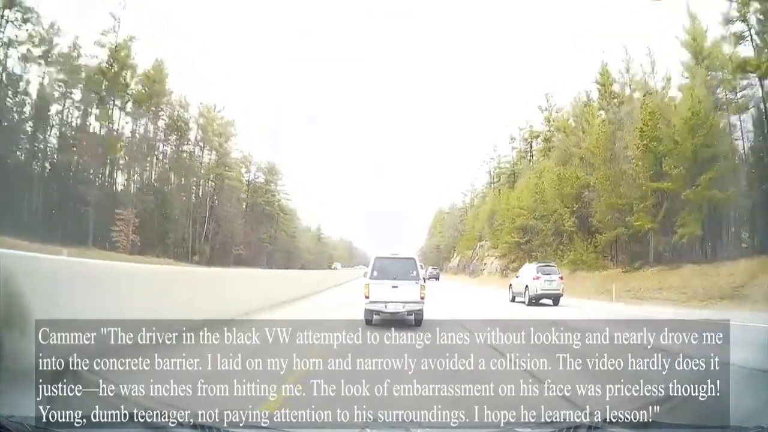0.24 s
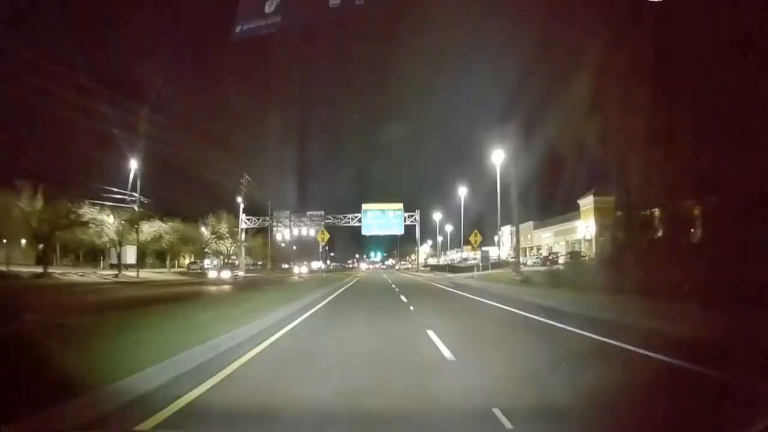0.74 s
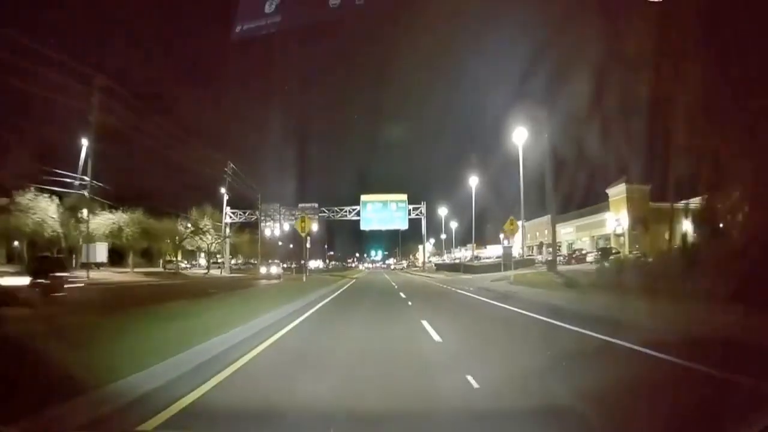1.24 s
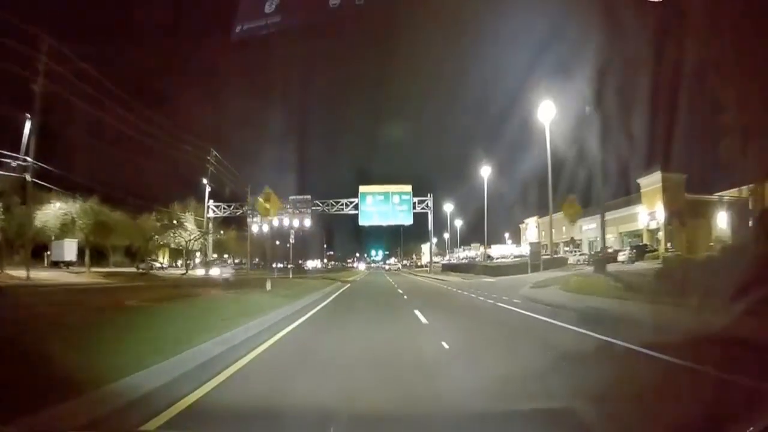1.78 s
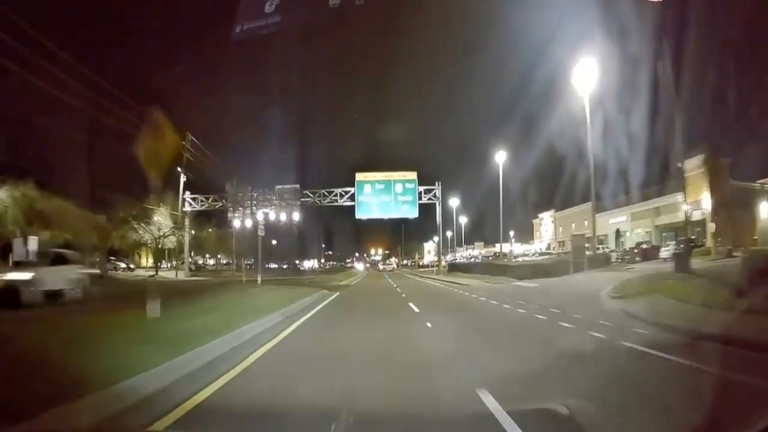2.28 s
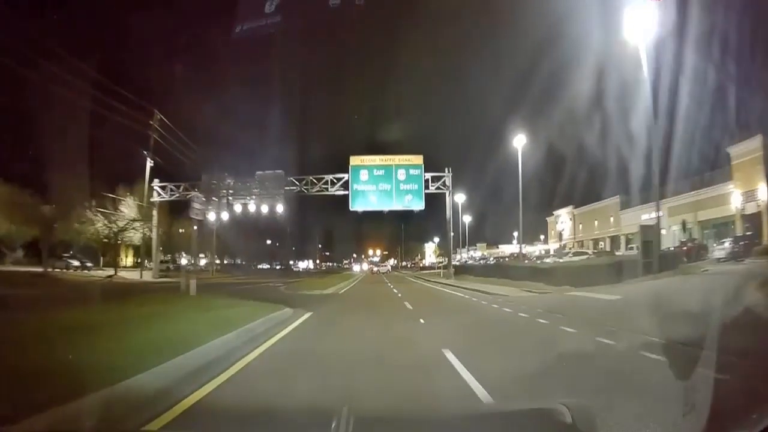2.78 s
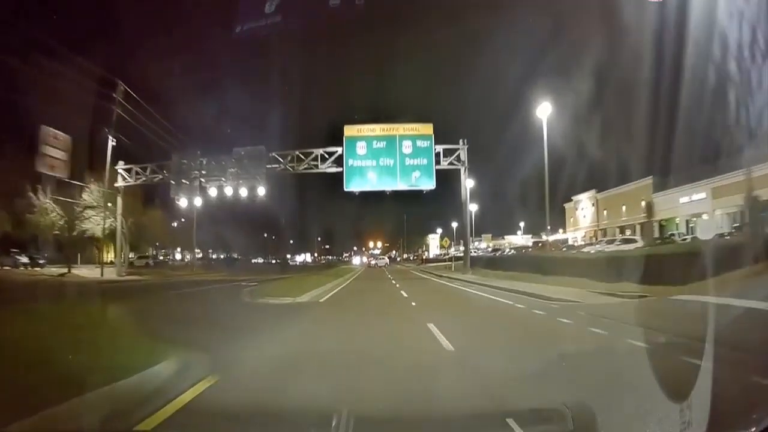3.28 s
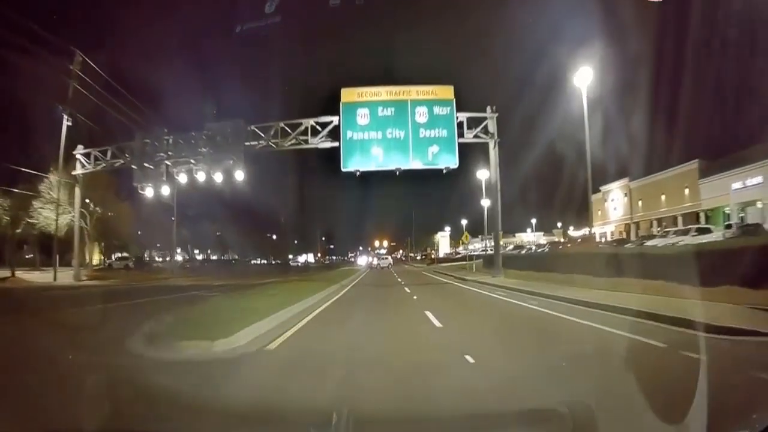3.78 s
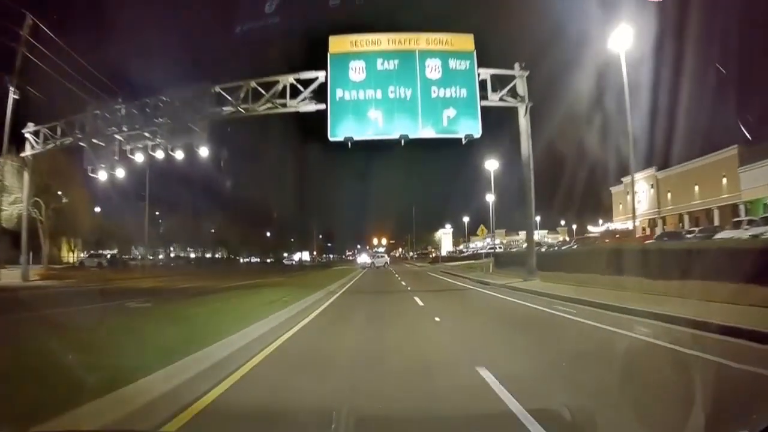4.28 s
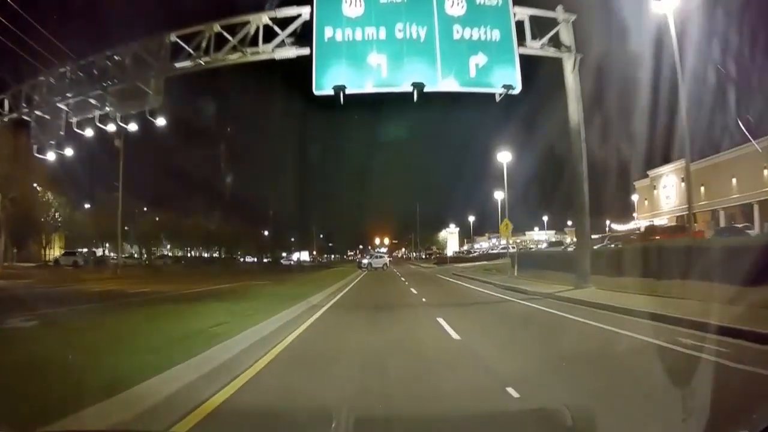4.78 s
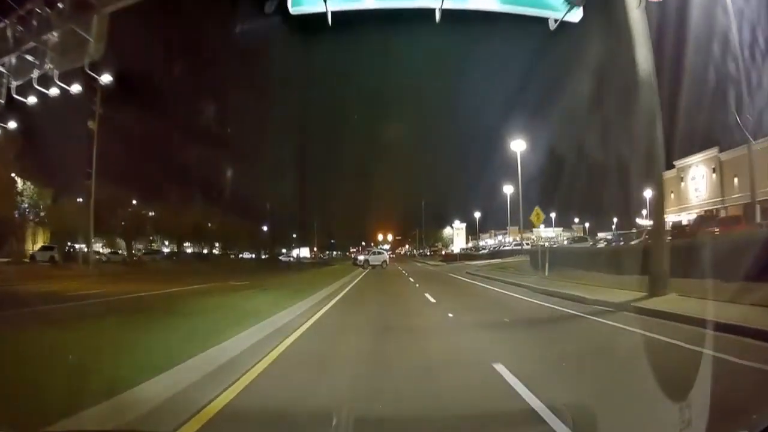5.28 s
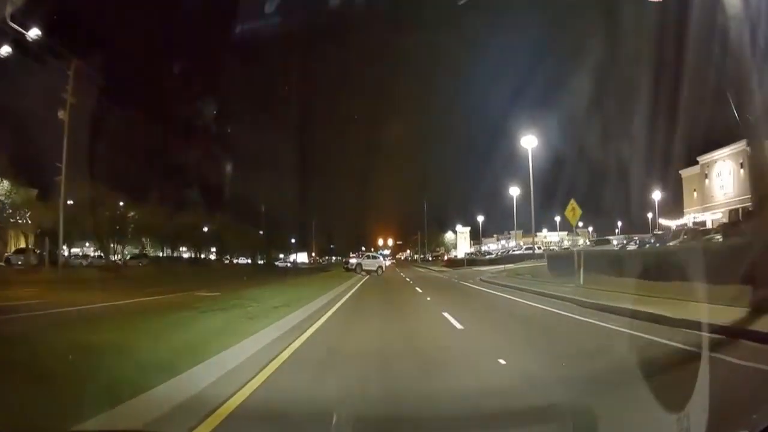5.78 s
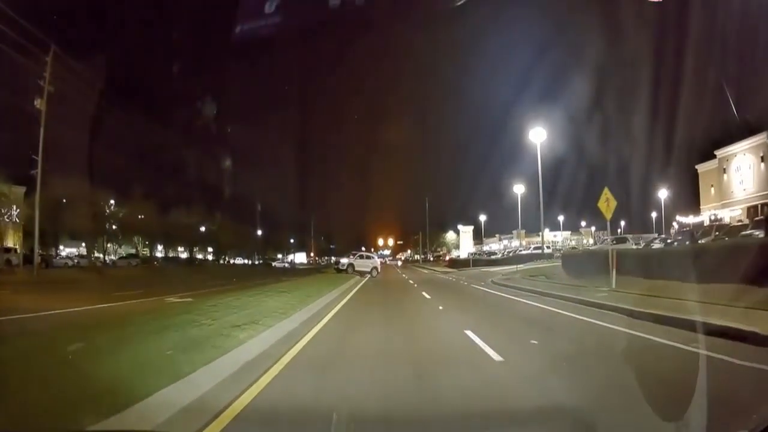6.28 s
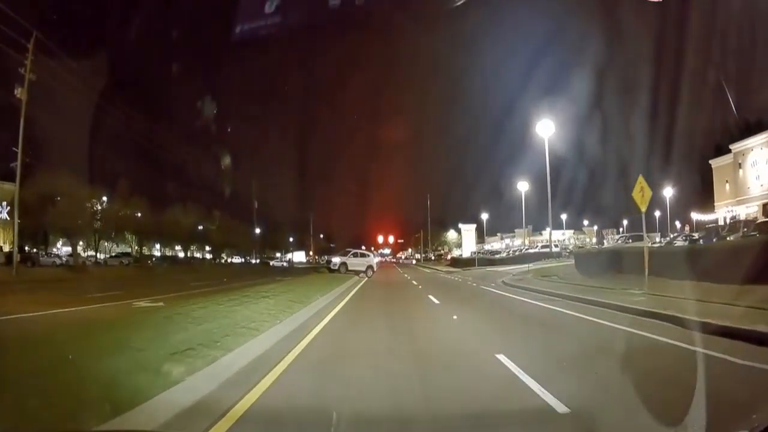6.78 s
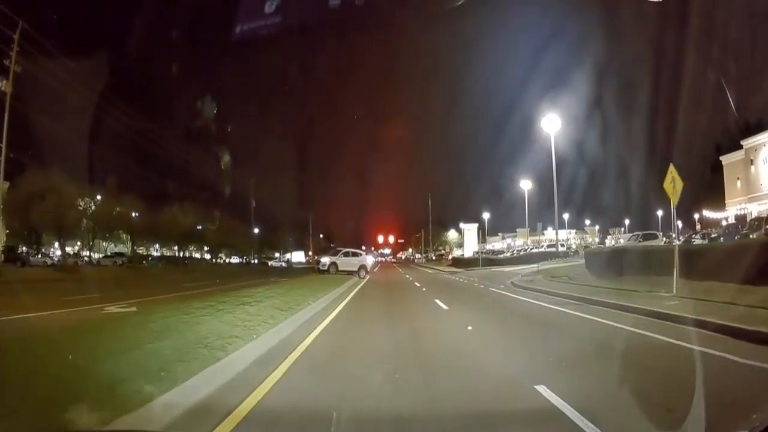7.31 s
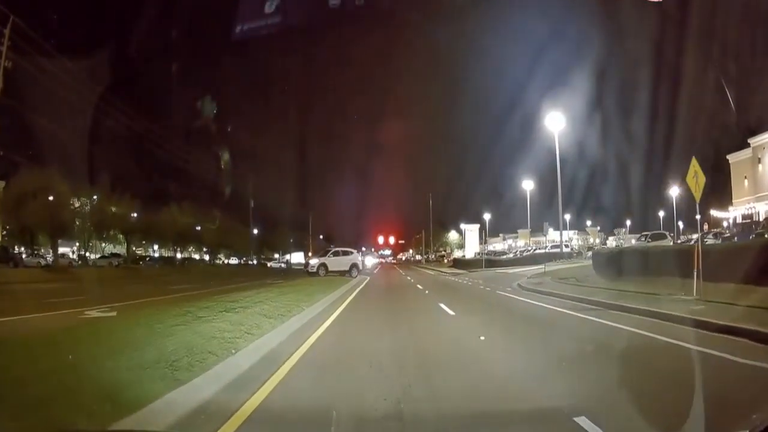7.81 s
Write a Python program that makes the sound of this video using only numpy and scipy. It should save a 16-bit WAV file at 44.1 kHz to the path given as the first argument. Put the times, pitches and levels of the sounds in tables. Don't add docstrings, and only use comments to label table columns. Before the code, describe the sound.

Silence until 0.7 s, then car cabin noise cuts in at once: deep body boom, humming floor and tyre resonance, broad tyre roar and coarse tread hiss, with a weak low engine note underneath. A small dry trim creak comes near 1.1 s and a lone knock near 2 s. At 2.8 s a hard short double thump starts a cluster of knocks with buzzing, rattling trim and a low body heave, ending with low thumps at 3.0 and 3.07 s. The surface is then smoother and the tread hiss drops. From 3.3 s the loose plastic camera mount ticks in light chattering clusters about every 0.6 s. The engine note sinks steadily; rumble swells slightly around 5 to 5.5 s, then road noise fades strongly until 8 s, exposing thin microphone hiss. Close, slightly dull small-camera sound with tiny compression flutters.

```python
import sys
import numpy as np
from scipy import signal
from scipy.fft import rfft, irfft, next_fast_len
from scipy.io import wavfile
from scipy.ndimage import uniform_filter1d

SR = 44100
rng = np.random.default_rng(int(sys.argv[2]) if len(sys.argv) > 2 else 0)


def to_wav(s):
    ch = np.atleast_2d(s).T
    pcm = np.round(np.clip(ch, -1, 1) * 32767)
    wavfile.write(sys.argv[1], SR, pcm.astype(np.int16))


def convert_level_to_amplitude(level_db):
    exponent = np.asarray(level_db, float) / 20
    return 10 ** exponent


N = 355005
T = np.arange(N) / SR
BURST_T = np.arange(4000) / SR
COARSE_END_S = 3.115


def evened(x):
    return x / np.sqrt(np.mean(x ** 2) + 1e-20)


def curves(rows):
    s, *columns = np.transpose(rows)
    return [np.interp(T, s, column) for column in columns]


def add(mix, start_s, sound):
    part = mix[round(start_s * SR):][:len(sound)]
    part += sound[:len(part)]


def resonance(hz, centre_hz, width_hz):
    return 1 / (1 + (2 * (hz - centre_hz) / width_hz) ** 2)


def colour(points, lifts=()):
    point_hz, point_db = np.transpose(points)

    def shape(hz):
        slope_db = np.interp(np.log(hz + 1), np.log(point_hz), point_db)
        return convert_level_to_amplitude(slope_db + sum(db * resonance(hz, centre, width) for centre, width, db in lifts))
    return shape


def modes(rows):
    return lambda hz: np.sqrt(sum((convert_level_to_amplitude(db) * resonance(hz, centre, width)) ** 2 for centre, width, db in rows))


def noise(shape, size=N):
    long = next_fast_len(size)
    spectrum = rfft(rng.standard_normal(long))
    return evened(irfft(spectrum * shape(np.fft.rfftfreq(long, 1 / SR)), long)[:size])


def wobble(top_hz):
    return noise(lambda hz: (hz > .5) / (1 + (hz / top_hz) ** 4))


def burst(shape, length_s, rise_s=0.00049):
    envelope = np.minimum(BURST_T / rise_s, 1) * np.exp(-(BURST_T / length_s) ** 1.5)
    return noise(shape, size=4000) * envelope


def coarse(fade_s):
    return np.clip((COARSE_END_S - T) / fade_s, 0, 1)


# start_s, unevenness_db, tyre_ripple_db, fine_texture_db
ROAD = [(.8, -25, -44, -29), (1.2, -27.5, -37, -29), (1.6, -30.5, -37, -29.5), (2.0, -28.5, -35, -29),
        (2.6, -25.5, -30, -28), (3.07, -29, -46.5, -29.5), (3.25, -29, -30, -33), (3.6, -29, -35.5, -33),
        (3.95, -28, -34, -34), (4.3, -26.5, -31, -36.5), (4.7, -26, -32.5, -36), (5.15, -25, -33, -38.5),
        (5.55, -25.5, -29.5, -40.5), (6.1, -29, -35, -43.5), (6.45, -30, -42, -45.5),
        (6.95, -31.5, -46.5, -47), (7.4, -37.5, -52, -48.5), (8.05, -39.5, -61, -51)]
# centre_hz, width_hz, level_db
BOOM = [(30, 39, -1.5), (42.5, 15, 4.5), (52.3, 16, -16)]
PANEL = [(109.8, 14, -4), (123.9, 8.4, 2), (139, 9.5, -3.5), (153.4, 34.5, -9), (87, 23, -15),
         (312, 90, -19)]
CAVITY = [(195, 23, -14), (225.4, 8, -4), (242, 6, 3.5), (258.8, 18, -12.5)]
# level_db at reference, follow_db_per_db, swell_db, swell_hz
FOLLOW = [
    (-33, 0.95, 1.1, 4.1),
    (-31, 1.0, 1.64, 9.6),
    (-28, 1.0, 1.0, 16),
]
COARSE_SHAKE_DB = (1.5, -4, -.5)


def structure():
    shake_ref_db = -28
    out = np.zeros(N)
    uneven_db, ripple_db, _ = curves(ROAD)
    on_coarse = coarse(.3)
    layers = zip((BOOM, PANEL, CAVITY), (uneven_db, uneven_db, ripple_db), COARSE_SHAKE_DB, FOLLOW)
    for rows, shake_db, coarse_db, (db, follow, swell_db, swell_hz) in layers:
        hum = noise(modes(rows))
        swell = np.sqrt(uniform_filter1d(uniform_filter1d(hum ** 2, 4500), 4500) + .05)
        level_db = db + follow * (shake_db - shake_ref_db) + coarse_db * on_coarse
        level_db = level_db + swell_db * wobble(swell_hz)
        out += convert_level_to_amplitude(level_db) * hum / swell ** .9
    return out


def grip():
    return curves(ROAD)[2] + 35


# corner_hz, level_db_per_hz
ROAR = [(15, -30), (70, -2.5), (240, 2.5), (600, -5.5), (1100, -7.5), (1350, -14.5), (1700, -44),
        (2400, -58.5)]
TREAD = [(900, -26), (1400, 7), (2000, 0), (2650, -2), (3580, -8.5), (3800, -16), (4800, -20.5),
         (8000, -24)]
# centre_hz, width_hz, lift_db
CABIN = [(20, 5, 8), (314, 37, -5), (361.6, 9.6, 7), (402.4, 14, 3.5), (465, 48, 3), (539, 46, 4.5),
         (659.6, 38, 5.5), (756, 54, 6), (901, 102, 5.5), (1023, 30.5, 8), (1187, 86, 5), (1297, 88, 3),
         (1670, 40, 12)]
HOUSING = [(2905, 140, 8), (3130, 110, 3), (3510, 140, 6)]


def tyres():
    roar_db, tread_db, coarse_tread_db, wind_db = -33, -56.5, 2.5, -65
    grip_db = grip()
    texture = wobble(19.0)
    roar = convert_level_to_amplitude(roar_db + grip_db + 0.47 * texture) * noise(colour(ROAR, CABIN))
    tread = convert_level_to_amplitude(tread_db + grip_db + coarse_tread_db * coarse(.03))
    tread = tread + convert_level_to_amplitude(wind_db)
    tread = tread * convert_level_to_amplitude(0.2 * texture + 1.06 * wobble(22.5)) * noise(colour(TREAD, HOUSING))
    return roar + tread


# start_s, knock_peak_db, length_s, rattle_db, low_mode_db
JOINTS = [
    (2.7800, -9, .005, -39, -7),
    (2.7904, -15, .02, -42, -14),
    (2.9978, -14, .006, -31.5, 2),
    (3.0650, -15, .009, -31.5, -2),
    (2.799, -26, .014, -36, -5),
    (2.864, -28, .008, -35, -5),
    (2.941, -28, .02, -42, -5),
    (3.458, -26, .02, -45, 0),
    (1.96, -21, .008, -50, -5),
    (5.652, -33, .008, -60, -5),
]


def joints():
    knock_hz, low_knock_hz = 960, 490
    rattle_points = [(1200, 5.0), (3000, -1.5), (5000, -10.5), (9000, -24), (16000, -33)]
    out = np.zeros(N)
    for s, db, length_s, rattle_db, low_db in JOINTS:
        panel = np.sin(2 * np.pi * knock_hz * BURST_T)
        panel = panel + convert_level_to_amplitude(low_db) * np.sin(2 * np.pi * low_knock_hz * BURST_T)
        panel = panel * np.minimum(BURST_T / .0015, 1) * np.exp(-BURST_T / length_s)
        rough = convert_level_to_amplitude(-8) * burst(modes([(knock_hz, 1100, 0)]), length_s)
        rattle = burst(colour(rattle_points, HOUSING), length_s)
        add(out, s, convert_level_to_amplitude(db - 3) * (panel + rough) + convert_level_to_amplitude(rattle_db) * rattle)
    return out


def heave():
    start_s, level_db, pitch_hz, length_s = 2.9, -25, 22, .14
    t = T - start_s
    return convert_level_to_amplitude(level_db) * np.sin(2 * np.pi * pitch_hz * t) * np.exp(-(2 * t / length_s) ** 2)


# pitch_hz, level_db, t60_s
RING = [(2900, -7, .035), (3510, -3, .018), (3900, -1, .009), (2400, -9, .014)]


def tick(pitch_hz, bright_db):
    t = BURST_T
    chance = rng.random((len(RING), 2))
    ring = np.sin(2 * np.pi * pitch_hz * t) * convert_level_to_amplitude(-60 * t / .012)
    for (hz, db, t60_s), (phase, share) in zip(RING, chance):
        ring = ring + convert_level_to_amplitude(db - 9 * share - 60 * t / t60_s) * np.sin(2 * np.pi * (hz * t + phase))
    ring = ring / abs(ring).max() * np.minimum(t / .0014, 1)
    rebound_s = .003 + .005 * chance[0, 0]
    rebound = convert_level_to_amplitude(-8) * np.roll(ring, round(SR * rebound_s))
    puff = convert_level_to_amplitude(bright_db - 2.5) * burst(modes([(5300, 2000, 0)]), 0.004, rise_s=0.0012)
    smear = convert_level_to_amplitude(-18.5) * burst(colour(TREAD, HOUSING), 0.018)
    return ring + rebound + smear + puff


# start_s, peak_db, pitch_hz, bright_db
TICKS = [(3.2604, -40, 2690, -15), (3.3443, -36, 3620, -21), (3.3987, -36.5, 2890, -11.5),
         (3.9472, -37, 3670, -18), (3.9666, -41, 3450, -18), (3.9908, -37, 3490, -17),
         (4.0146, -45, 2930, -18), (4.5261, -42, 2590, -14), (4.5925, -39, 2510, -15),
         (4.6083, -39, 3570, -18), (4.6623, -41.5, 3560, -12), (5.1599, -42, 3500, -18),
         (5.1861, -37, 3110, -19.5), (5.2474, -33, 3510, -16), (5.2774, -34.5, 3500, -11),
         (5.298, -38, 2840, -13), (5.5075, -43, 2500, -18), (5.7848, -40, 3580, -12),
         (5.8563, -33.5, 3550, -21), (5.8704, -44, 3500, -18), (5.91, -38, 3540, -18),
         (5.9369, -44, 2930, -18), (6.3949, -41.5, 3590, -18), (6.4809, -35.5, 3530, -18),
         (6.5312, -32, 3540, -17), (6.554, -38, 3070, -18), (7.101, -37, 3130, -17),
         (7.1761, -36.5, 2863, -24), (7.6351, -41.5, 3097, -20), (7.7738, -43, 2890, -18)]


def mount_rattle():
    chatter_s, chatter_db = .012, -7
    out = np.zeros(N)
    for s, db, hz, bright_db in TICKS:
        late, change = rng.uniform(-1, 1, 2)
        add(out, s, convert_level_to_amplitude(db + 2.5) * tick(hz, bright_db))
        again = tick(hz * (1 + 0.16 * change), bright_db)
        add(out, s + chatter_s * (1 + .4 * late), convert_level_to_amplitude(db + chatter_db + 4.2 * change) * again)
    return out


# start_s, pitch_hz
ENGINE = [(0.95, 61.4), (2.39, 61.5), (3.07, 58.2), (3.64, 50.4), (4.29, 44.3), (5.0, 42.3), (5.52, 37.2),
          (6.17, 35.17), (6.72, 31.8), (8.05, 28.8)]


def engine():
    level_db, mount_hz, mount_width_hz, mount_lift_db = -44, 44.7, 12, 8.5
    hz, = curves(ENGINE)
    db = level_db + mount_lift_db * resonance(hz, mount_hz, mount_width_hz)
    turn = 2 * np.pi * np.cumsum(hz * (1 + 0.0034 * wobble(3.4))) / SR
    tone = np.sin(turn) + convert_level_to_amplitude(-14.0) * np.sin(2 * turn)
    return np.sqrt(2) * convert_level_to_amplitude(db + 1.9 * wobble(1.5)) * tone


def trim_buzz():
    start_s, end_s, level_db = 2.79, 3.1, -49
    gate = (T > start_s) * (T < end_s)
    return convert_level_to_amplitude(level_db + 2.5 * wobble(90.)) * gate * noise(modes([(2100, 2200, 0), (6000, 9000, -20)]))


# start_s, level_db, length_s
FIZZ = [
    (1.081, -50, .022),
    (3.543, -59.5, .015),
    (5.275, -62, 0.01063),
]


def trim_creaks():
    out = np.zeros(N)
    for s, db, length_s in FIZZ:
        add(out, s, convert_level_to_amplitude(db) * burst(modes([(7760, 9700, 0)]), length_s))
    return out


# corner_hz, level_db_per_hz
SELF_NOISE = [(500, 3.5), (4000, 2.5), (7000, 0), (11000, -1.5), (13500, -1.5), (14800, -4), (16000, 1)]


def self_noise():
    hiss_db, hiss_follow, coarse_hiss_db = -62, 0.026, 2.0
    creep_gain_db, creep_s = 3.5, 1.2
    whine_hz, whine_width_hz, whine_db = 14800, 350, -79
    whine = convert_level_to_amplitude(whine_db) * noise(modes([(whine_hz, whine_width_hz, 0)]))
    creep_db = creep_gain_db * (1 - np.exp(-np.maximum(T - COARSE_END_S, 0) / creep_s))
    level_db = hiss_db + hiss_follow * grip() + coarse_hiss_db * coarse(.03) + creep_db
    return whine + convert_level_to_amplitude(level_db + 0.58 * wobble(21.0)) * noise(colour(SELF_NOISE))


def scene():
    road = structure() + tyres() + joints() + heave()
    car = mount_rattle() + engine() + trim_buzz() + trim_creaks()
    return (road + car + self_noise())[None]


# centre_s, edge_hz
TREBLE_DROPS = [(.774, 4000), (.994, 3600), (1.293, 3700), (1.533, 3800), (1.853, 3900), (2.27, 3700),
                (2.35, 3700), (2.768, 3600), (2.888, 4200), (2.897, 4200), (2.906, 4200), (3.088, 3700),
                (3.666, 3600), (4.484, 3600), (4.824, 2800), (5.021, 3400), (5.14, 3400), (6.257, 4500),
                (6.437, 5400), (6.577, 3600), (6.78, 4000), (6.875, 3400), (7.873, 3000), (7.955, 3400)]


def drop_treble(x):
    depth_db, width_s = 16, 0.0065
    hz, t, z = signal.stft(x, SR, nperseg=256, noverlap=192)
    loss_db = sum(depth_db * (hz[:, None] > edge_hz) * np.exp(-((t - s) / width_s) ** 2)
                  for s, edge_hz in TREBLE_DROPS)
    return signal.istft(z * convert_level_to_amplitude(-loss_db), SR, nperseg=256, noverlap=192)[1][:, :N]


# band_hz, lost_share
HOLES = [(10500, 0), (13100, .02), (13500, .2), (14500, .22), (14800, .08), (15300, .15), (15700, .35)]


def punch_holes(x):
    hz, t, z = signal.stft(x, SR, nperseg=1024, noverlap=768)
    luck = rng.random((len(t) // 7 + 1, len(hz) // 5 + 1))
    luck = luck.repeat(7, axis=0).repeat(5, axis=1)[:len(t), :len(hz)].T
    odds = np.interp(hz, *np.transpose(HOLES))[:, None]
    z = z * np.where(luck < odds, convert_level_to_amplitude(-20), convert_level_to_amplitude(5 * odds))
    return signal.istft(z, SR, nperseg=1024, noverlap=768)[1][:, :N]


# centre_s, pitch_hz, level_db
BIRDIES = [(.994, 4250, -64), (1.29, 5100, -66), (2.888, 5600, -58), (3.088, 4330, -59), (6.257, 5800, -70),
           (6.875, 8700, -69), (2.785, 5020, -56), (7.903, 1590, -55)]


def birdies():
    length_s = 0.033
    return sum(convert_level_to_amplitude(db - 35 * ((T - s) / length_s) ** 2) * np.sin(2 * np.pi * hz * T) for s, hz, db in BIRDIES)


def top_cut(x):
    return signal.sosfilt(signal.butter(12, 15940, fs=SR, output="sos"), x)


def record(dry):
    start_s, edge_hz = .6961, 15680
    kept = punch_holes(drop_treble(dry)) + birdies()
    lowpass = signal.firwin(511, edge_hz, window=("kaiser", 9), fs=SR)
    kept = signal.oaconvolve(kept, lowpass[None], "same")
    finished = kept * np.clip((T - start_s) / .0001, 0, 1)
    return top_cut(finished)


dry = scene()
out = record(dry)
to_wav(out)
```